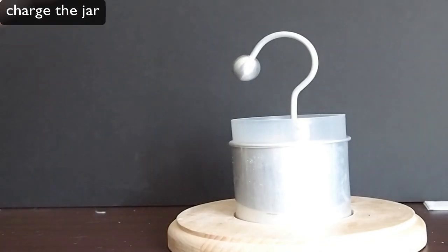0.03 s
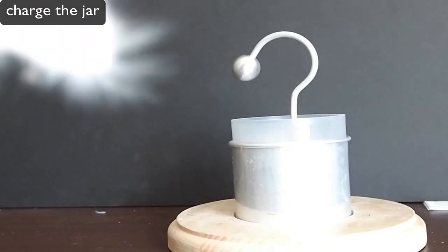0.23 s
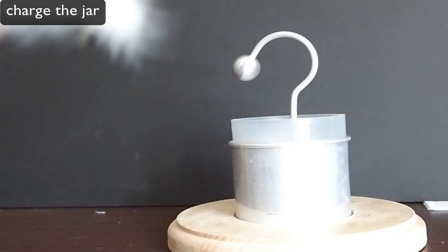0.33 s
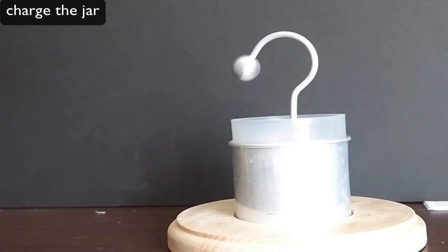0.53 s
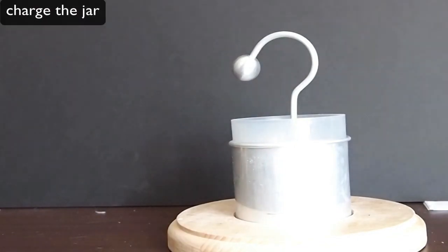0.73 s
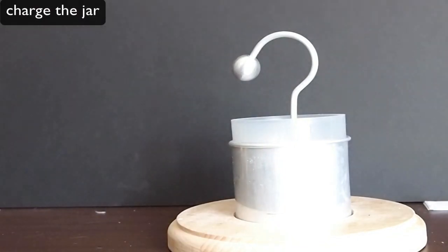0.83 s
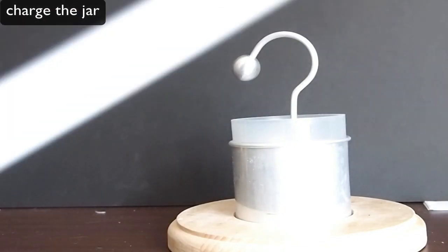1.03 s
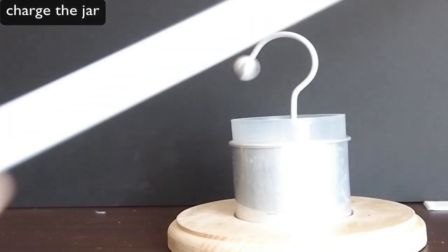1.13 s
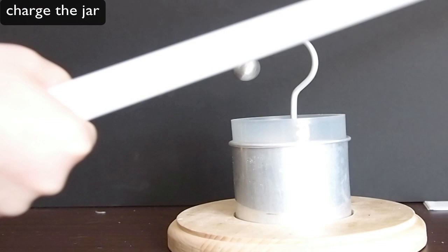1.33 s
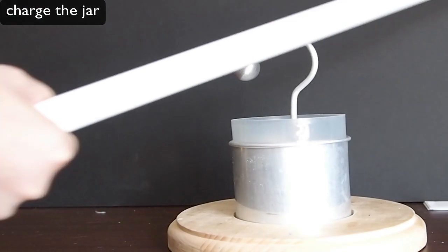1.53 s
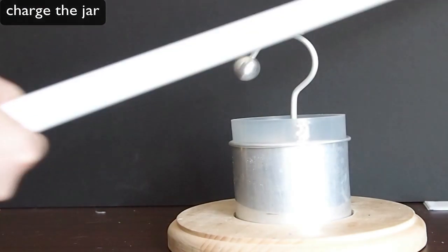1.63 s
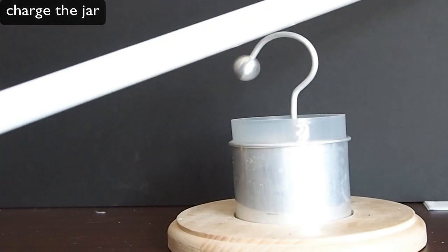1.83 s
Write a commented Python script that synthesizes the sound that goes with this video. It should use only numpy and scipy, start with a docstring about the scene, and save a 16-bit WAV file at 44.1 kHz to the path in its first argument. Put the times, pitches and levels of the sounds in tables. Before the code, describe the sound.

Fine static crackling and swishing come from two quick strokes of fur on a plastic pipe. A moment later a single tiny spark ticks sharply, in a quiet room with low fan hum and a faint microphone whine.

```python
"""Static sparks from fur and a pipe

Fur is stroked twice along a plastic pipe: the hairs swish and tiny static sparks crackle.
The charged pipe is then held to the metal hook of a jar, and one spark snaps across.
The room is small and quiet, with a hum from the mains power and a fan.
The microphone hisses and whines faintly, and a narrow band of its treble is cut out."""
import sys
import numpy as np
from scipy import signal
from scipy.fft import rfft, irfft
from scipy.io import wavfile
from scipy.ndimage import uniform_filter1d

SR = 44100
rng = np.random.default_rng(int(sys.argv[2]) if len(sys.argv) > 2 else 0)


def file_out(sig):
    """Save sig as 16-bit WAV at sys.argv[1]."""
    # one column per channel
    cols = np.atleast_2d(sig).T
    # limit, then scale
    lim = np.clip(cols, -1, 1)
    pcm = np.round(lim * 32767).astype(np.int16)
    wavfile.write(sys.argv[1], SR, pcm)


N = 83790

# The bright tone of a small spark. Each row: frequency in Hz, relative level in dB.
SPARK_SPECTRUM = [(1000, -42), (3000, -27.5), (5500, -16.5), (7000, -2), (8600, 2), (10000, -3),
                  (12500, -9.5), (16000, -15.5)]


def undb(db):
    """Turn decibels into a number to multiply a sound by."""
    return 10 ** (np.asarray(db) / 20)


def unit(x):
    """Scale a sound so that its average level (rms) is 1."""
    return x / np.sqrt(np.mean(x ** 2))


def curve(table, column=1):
    """Loudness that glides from row to row of a table of seconds and dB."""
    rows = np.array(table)
    return undb(np.interp(np.arange(N) / SR, rows[:, 0], rows[:, column]))


def click(spectrum, size=512):
    """A click with the given tone and a peak of 1."""
    hz, db = np.array(spectrum).T
    freqs = np.maximum(np.fft.rfftfreq(size, 1 / SR), 1)
    gains = undb(np.interp(np.log(freqs), np.log(hz), db))
    cepstrum = irfft(np.log(gains))
    # Folding this onto its first half packs the energy at the start of the click.
    cepstrum[1:size // 2] *= 2
    cepstrum[size // 2 + 1:] = 0
    wave = irfft(np.exp(rfft(cepstrum)))
    return wave / np.abs(wave).max()


def through(x, shape):
    """Replace every sample of x with a scaled copy of the shape."""
    return signal.fftconvolve(x, shape)[:N]


def noise(spectrum):
    """Steady noise with the given tone and an average level of 1."""
    shape = click(spectrum, size=8192)
    white = rng.standard_normal(N + len(shape) - 1)
    return unit(signal.fftconvolve(white, shape, "valid"))


def pulses(times, gains):
    """A one-sample spike at each time, given in seconds."""
    out = np.zeros(N)
    samples = np.round(times * SR).astype(int)
    np.add.at(out, np.clip(samples, 0, N - 1), gains)
    return out


def flutter(rate_hz):
    """A smooth random wobble, mostly between -1 and 1."""
    hold = max(int(SR / rate_hz), 1)
    steps = np.repeat(rng.standard_normal(N)[:N // hold + 1], hold)
    return uniform_filter1d(steps, hold)[:N]


def fur_strokes():
    """Hairs slide and catch: a high swish, a lower rustle on the pipe and a spray of tiny sparks."""
    # The two strokes. Each row: time in seconds, relative swish and rustle levels in dB.
    strokes = [(0, -45.5, -55.5), (.06, -50, -73), (.115, -42, -52.5), (.15, -34, -45), (.18, -43, -49),
               (.222, -44, -59), (.236, -71, -70), (.27, -53, -58), (.322, -44.5, -56), (.335, -42, -56),
               (.355, -35, -45.5), (.4, -30, -48), (.46, -30, -47.5), (.52, -35.5, -53.5),
               (.6, -36.5, -45.5), (.648, -35, -48.5), (.668, -66, -53), (.7, -80, -85)]
    # The tones of the swish and the rustle. Each row: frequency in Hz, relative level in dB.
    swish_spectrum = [(1000, -43), (3000, -24.5), (4600, -15), (5800, -14.5), (7100, -5), (8400, 0),
                      (10000, -6.5), (12500, -9.5), (16000, -14.5)]
    rustle_spectrum = [(400, -12), (1250, -9.5), (2000, -4.5), (2700, -6), (3500, -2.5), (4600, -5),
                       (6000, -10.5), (12000, -30)]
    sparks_per_second, spread_db = 2000, 4.5
    grip = undb(2.05 * flutter(rate_hz=140))
    stroke = curve(strokes)
    fires = rng.random(N) < sparks_per_second / SR
    sizes = undb(spread_db * np.minimum(rng.standard_normal(N), 2))
    crackle = undb(-7.5) * unit(through(fires * sizes, click(SPARK_SPECTRUM)))
    swish = undb(-4) * noise(swish_spectrum)
    rubbing = unit(noise(rustle_spectrum) + undb(-3) * pipe_ring())
    rustle = undb(-1) * curve(strokes, column=2) * rubbing
    return grip * (stroke * swish + rustle) + stroke * crackle


def pipe_ring():
    """Rubbing makes the hollow pipe ring at three pitches."""
    # The pitches of the pipe. Each row: frequency in Hz, width in Hz, relative level in dB.
    resonances = [(1655, 170, -3), (1840, 140, -5.5), (2106, 230, -0.5)]
    ring = np.zeros(N)
    for hz, width, db in resonances:
        band = signal.iirpeak(hz, hz / width, fs=SR)
        ring += undb(db) * unit(signal.lfilter(*band, rng.standard_normal(N)))
    return unit(ring)


def hum_tone(hz):
    """One slightly wavering tone of the hum, with an average level of 1."""
    t = np.arange(N) / SR
    phase = 2 * np.pi * (hz * t + rng.random())
    return np.sqrt(2) * np.sin(phase + 0.27 * flutter(rate_hz=6))


def air_and_hum():
    """Ventilation rushes softly while the mains power and a fan hum."""
    # The tones of the hum. Each row: frequency in Hz, typical level in dB.
    hum_tones = [(28, -61.5), (118.8, -56), (171, -63.5), (229, -60.5), (239, -59.5), (285.3, -58),
                 (317, -63.5), (511.4, -62), (570.6, -64.5), (974.4, -71.5)]
    # The low rush of air. Each row: frequency in Hz, relative level in dB.
    air_spectrum = [(20, -3.5), (30, 1), (45, -12.5), (80, -6.5), (130, -5), (220, 0.5), (300, -4),
                    (400, -7.5), (700, -11.5), (1000, -13), (1450, -19.5), (2200, -19.5), (3500, -25),
                    (5600, -33.5), (16000, -56)]
    # A deep drone swells and fades. Each row: time in seconds, level in dB.
    drone_levels = [(0, -56), (.3, -53.5), (.38, -63.5), (.6, -54.5), (.72, -63), (1.15, -53.5),
                    (1.3, -48.5), (1.58, -46.5), (1.9, -49.5)]
    hum = sum(undb(db + 2.7 * flutter(rate_hz=5.2)) * hum_tone(hz) for hz, db in hum_tones)
    air = undb(-47) * noise(air_spectrum)
    drone = curve(drone_levels) * hum_tone(hz=57.1)
    return air + hum + drone


def microphone_noise():
    """The microphone adds hiss and a thin whine that pulses at the rate of the mains power."""
    # The tone of the hiss. Each row: frequency in Hz, relative level in dB.
    hiss_spectrum = [(2000, -15.5), (5600, -14.5), (7000, -2.5), (8300, 0), (11000, 0.5), (16000, 1)]
    whine_hz, pulse_hz, sharpness = 7844, 60.1, 9.4
    t = np.arange(N) / SR - 1.0055  # seconds from the top of one pulse
    pulsing = np.exp(sharpness * (np.cos(2 * np.pi * pulse_hz * t) - 1))
    whine = undb(-44.5) * pulsing * np.sin(2 * np.pi * whine_hz * t)
    return undb(-54) * noise(hiss_spectrum) + whine


def sparks():
    """Larger sparks jump between fur and pipe: each is a tick, a lower body and two weaker repeats."""
    # Each row: start in seconds, relative tick level in dB, dB added to that for the body.
    spark_events = [(0.095, -26, -33), (.1166, -23, -17), (0.1274, -14, -10), (0.135, -16.5, -9),
                    (0.1434, -19, -9), (.1492, -24, -17), (0.1601, -12.5, -13), (0.172, -23, -8),
                    (.1781, -16.5, -19), (0.1914, -18, -19), (0.1928, -14.5, -15), (.2023, -21, -17),
                    (0.212, -17, -12), (0.225, -19.5, -10), (0.263, -25.5, -24), (0.2687, -24.5, -11),
                    (.3257, -23, -19), (0.3305, -18.5, -18), (0.3352, -16.5, -26), (.343, -14, -18),
                    (0.348, -13, -19), (.3578, -13, -25), (.3633, -13, -24), (.3721, -13, -25),
                    (.3763, -15, -28), (0.3808, -15, -27), (0.386, -13, -27), (.39, -13, -27),
                    (0.394, -14, -30), (.3967, -9.5, -17), (0.4033, -10.5, -15.5), (0.4085, -13, -14),
                    (0.4125, -22, -24), (0.419, -13, -15), (0.425, -12, -15), (0.4328, -17, -14),
                    (0.4353, -18, -24), (.4395, -14, -23), (0.4446, -17, -24), (0.4502, -19, -16),
                    (0.4521, -7.5, -35), (.4674, -18, -26), (0.4721, -8.5, -20), (0.479, -18, -31),
                    (.482, -13, -22), (0.4876, -17, -30), (0.4937, -13, -14.5), (.5028, -14, -29),
                    (0.5079, -15, -12), (0.513, -11.5, -28), (.52, -15, -20), (0.5263, -11.5, -28),
                    (0.5316, -11.5, -20), (.5386, -15, -29), (0.5524, -14, -26), (0.557, -19, -25),
                    (.568, -13, -13.5), (.5855, -11, -16), (0.6025, -15, -10), (0.6132, -13.5, -19),
                    (.6231, -17, -18), (.6349, -24, -23), (.643, -12, -29), (0.651, -19, -23)]
    # The tone of the body. Each row: frequency in Hz, relative level in dB.
    body_spectrum = [(500, -21), (1200, -6.5), (1900, 0.5), (3000, 1.5), (4500, 4.5), (7000, -26),
                     (16000, -37)]
    longest_lag_s, repeat_db = .0012, -9.5
    times, db, body_db = np.array(spark_events).T
    strengths = undb(db - 3)
    ticks = pulses(times, strengths)
    for lag in longest_lag_s * rng.uniform(.1, 1, size=(len(times), 2)).T:
        ticks += pulses(times + lag, strengths * undb(repeat_db))
    body = pulses(times, undb(db + body_db - 1.5))
    return through(ticks, click(SPARK_SPECTRUM)) + through(body, click(body_spectrum))


def snap():
    """One spark jumps to the hook; its sound bounces off the pipe and jar and scatters around them."""
    # The direct sound and three bounces. Each row: delay in milliseconds, relative level in dB.
    paths = [(0, 0), (.23, 0.5), (.86, -5), (1.1, -4)]
    # The tone of the snap. Each row: frequency in Hz, relative level in dB.
    snap_spectrum = [(1000, -24), (2400, -14), (3700, -6), (5000, -8.5), (6500, -1.5), (8500, 3),
                     (10500, -6), (13000, -9), (16000, -10)]
    start_s, scatter_fade_s = 1.523, .001
    delay_ms, db = np.array(paths).T
    arrivals = pulses(start_s + delay_ms / 1000, undb(db))
    age = np.arange(N) / SR - start_s
    fade = (age > 0) * np.exp(-np.abs(age) / scatter_fade_s)
    scatter = undb(-10) * fade * rng.standard_normal(N)
    return undb(-18.5) * through(arrivals + scatter, click(snap_spectrum))


def echo_share(shape, db):
    """Scale the shape of an echo so that its total energy is the given dB."""
    return undb(db) ** 2 * shape / shape.sum()


def room(direct):
    """Add echoes from things close by, one wall and the whole room, as noise that follows the sound."""
    # The tone of the echoes. Each row: frequency in Hz, relative level in dB.
    echo_spectrum = [(1000, -35.5), (3000, -23), (5500, -18.5), (7000, -6.5), (8600, -4), (10000, -8),
                     (12500, -15.5), (16000, -14.5)]
    near_fade_s, wall_delay_s, wall_spread_s = .0014, .011, .0011
    tail_build_s, tail_fade_s = .011, .15
    t = np.arange(N) / SR
    near = echo_share(np.exp(-t / near_fade_s), db=-7)
    wall = echo_share(np.exp(-((t - wall_delay_s) / wall_spread_s) ** 2), db=-14.5)
    build = 1 - np.exp(-t / tail_build_s)
    fade = np.exp(-np.log(1000) * t / tail_fade_s)  # falls 60 dB in tail_fade_s
    tail = echo_share((build * fade) ** 2, db=-10)
    echo_energy = np.maximum(through(direct ** 2, near + wall + tail), 0)
    return direct + np.sqrt(echo_energy) * noise(echo_spectrum)


def scene():
    """The strokes, sparks and snap echo in the room over the air and hum, in one channel."""
    direct = fur_strokes() + sparks() + snap()
    return (room(direct) + air_and_hum())[None]


def record(dry):
    """The microphone adds its noise, then cuts out the middle of the whine and the highest treble."""
    notch_hz, width_hz, top_hz = 7873, 198, 15750
    edges_hz = [notch_hz - width_hz / 2, notch_hz + width_hz / 2]
    notch = signal.butter(3, edges_hz, "bandstop", fs=SR, output="sos")
    top_cut = signal.ellip(10, .2, 80, top_hz, fs=SR, output="sos")
    notched = signal.sosfilt(notch, dry + microphone_noise())
    return signal.sosfilt(top_cut, notched)


dry = scene()
out = record(dry)
file_out(out)
```